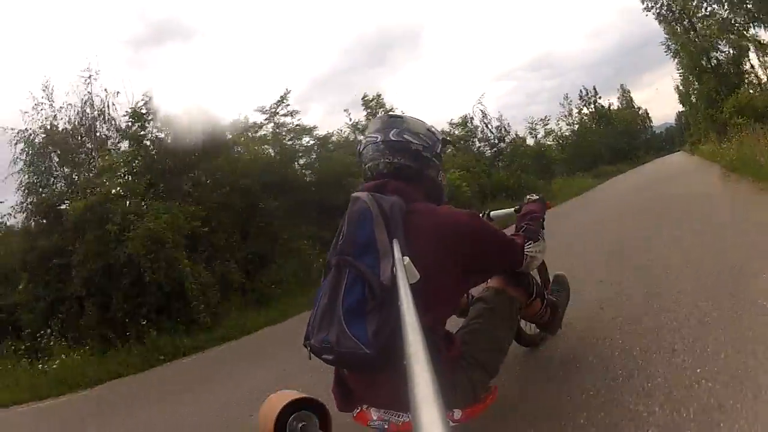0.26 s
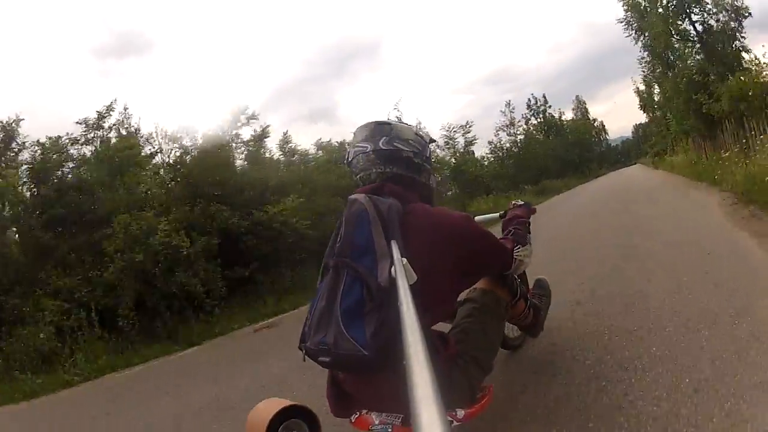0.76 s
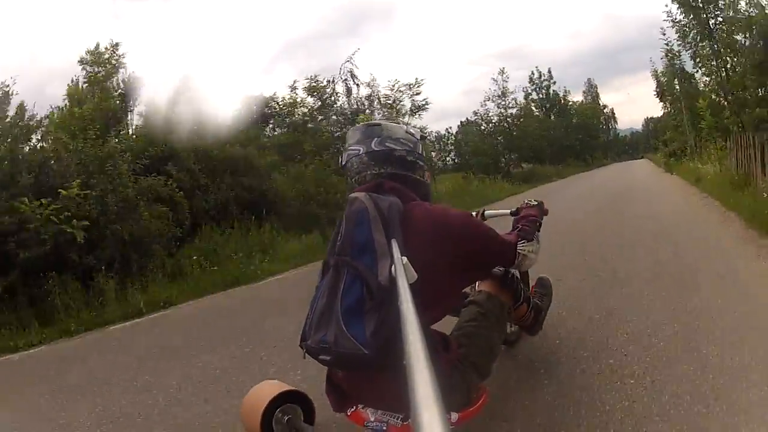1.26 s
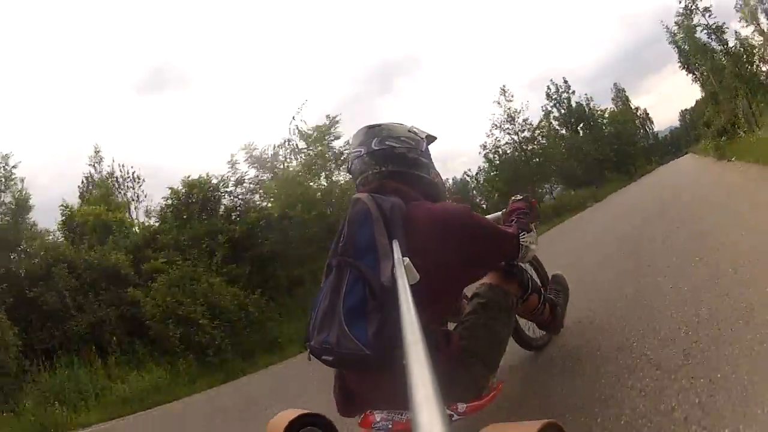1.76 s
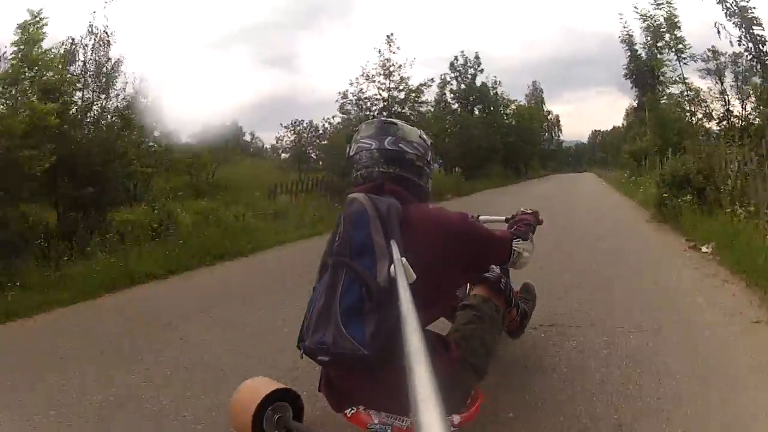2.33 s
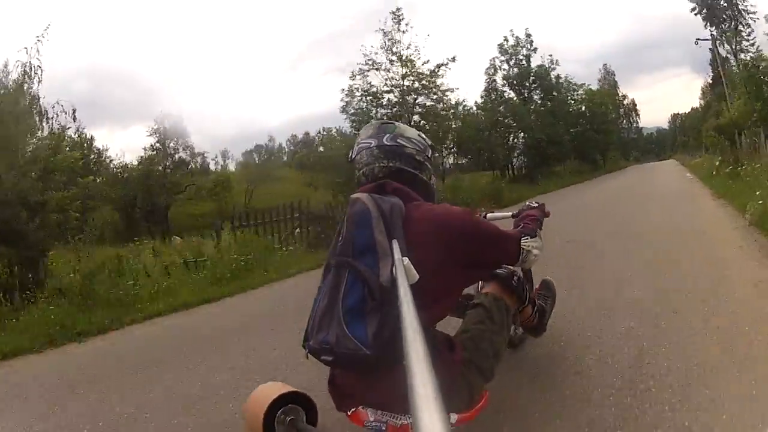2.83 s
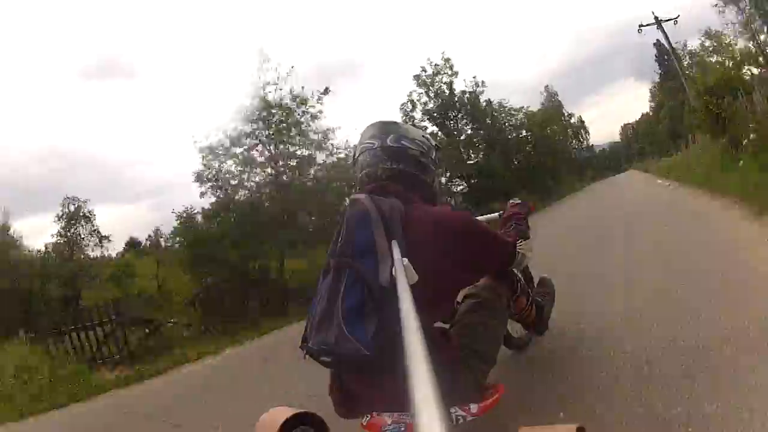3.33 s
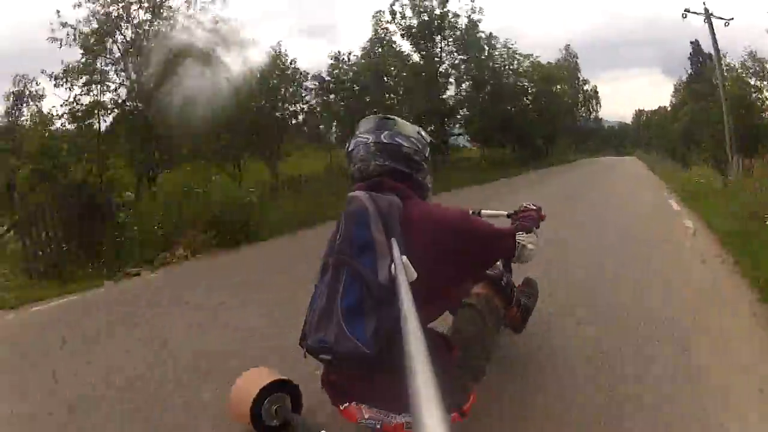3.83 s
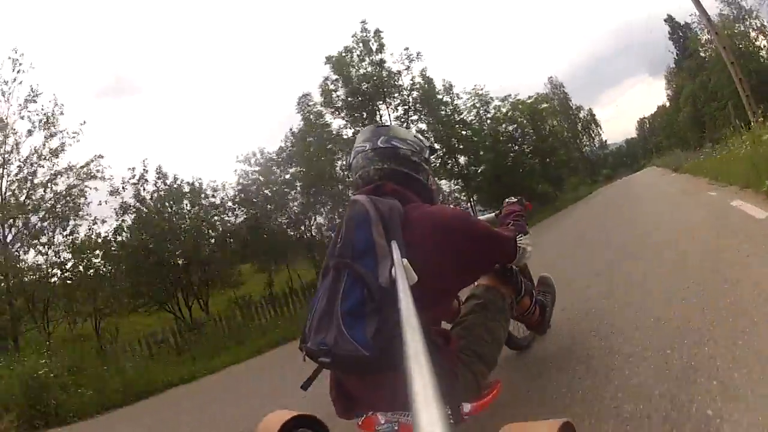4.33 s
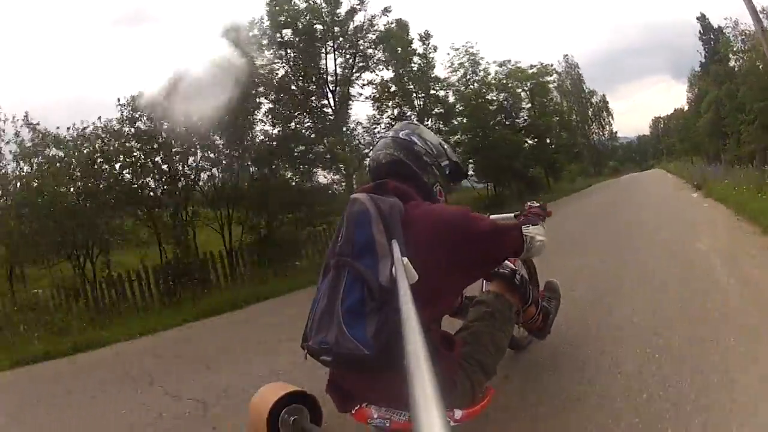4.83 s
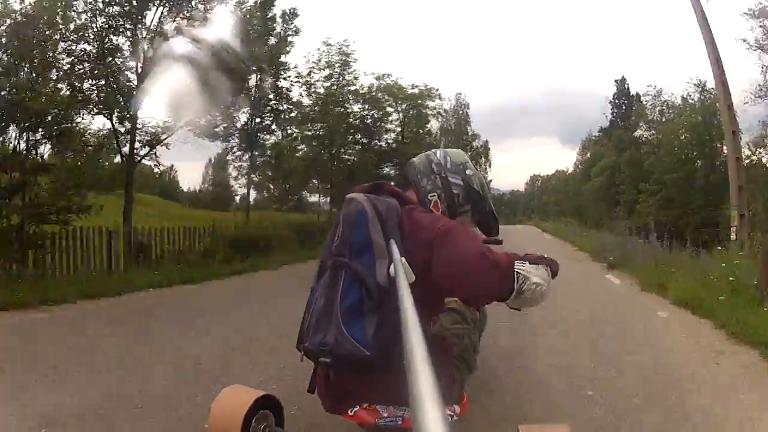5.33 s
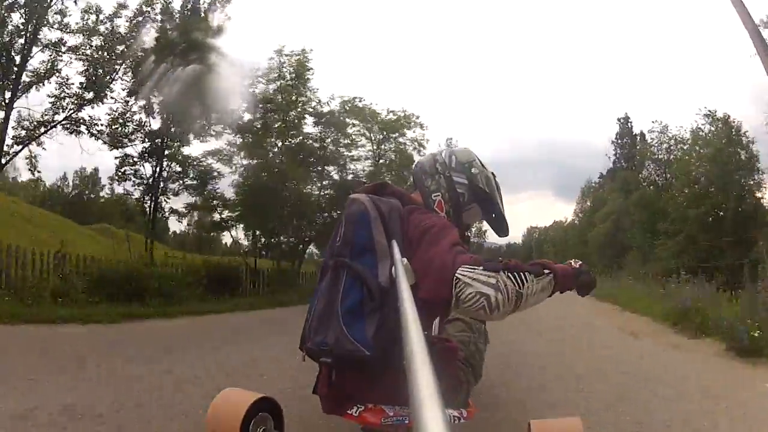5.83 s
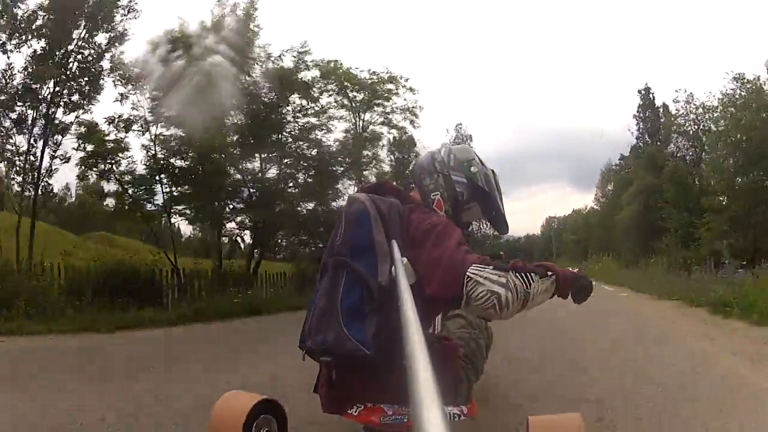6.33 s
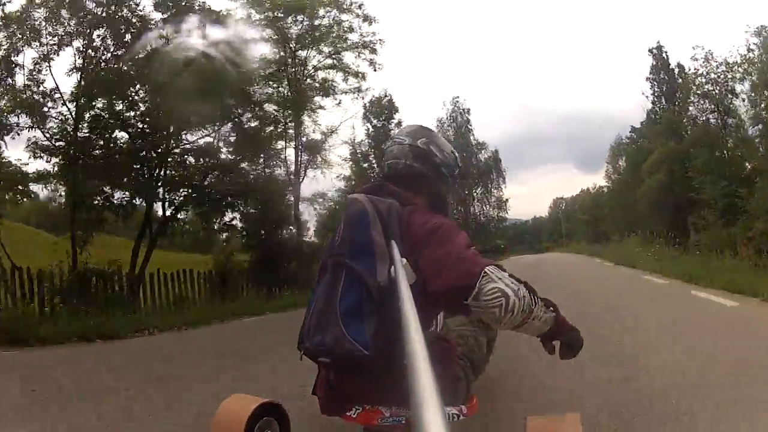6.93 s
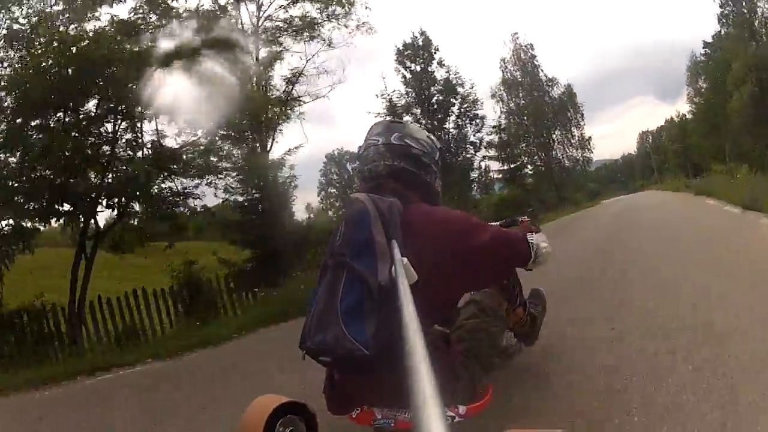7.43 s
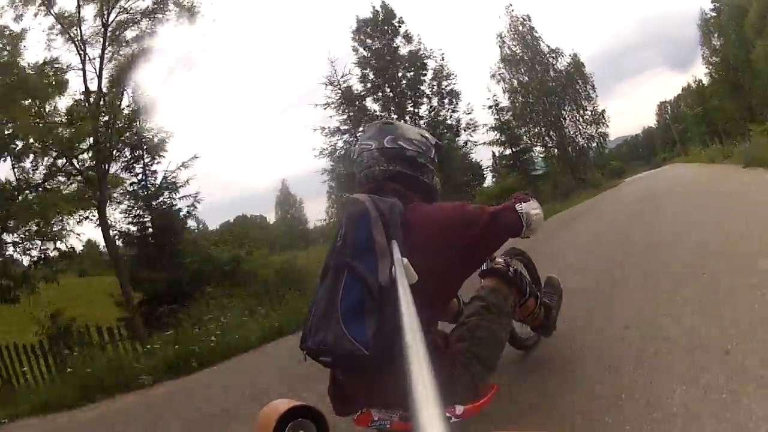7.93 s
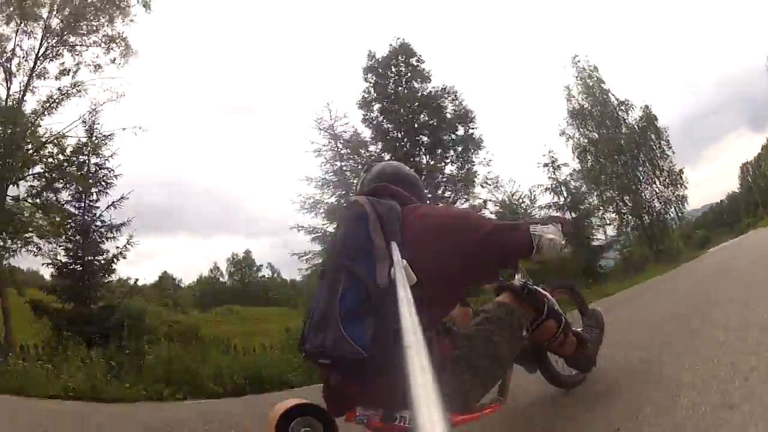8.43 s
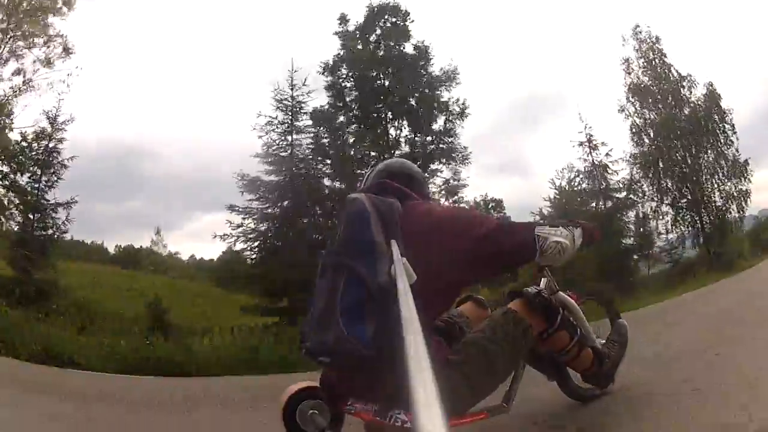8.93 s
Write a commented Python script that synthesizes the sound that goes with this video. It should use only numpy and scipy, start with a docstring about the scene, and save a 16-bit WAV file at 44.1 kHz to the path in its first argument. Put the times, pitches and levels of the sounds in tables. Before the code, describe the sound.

A fuzzy low wheel hum swells and fades over a shuddering pole and glassy hiss, broken by clacking mount knocks, small ticks and booming jolts.

```python
"""Hard wheels of a drift trike drone down an asphalt road: a fuzzy band that rises in pitch as it swells.
They shudder the pole behind the seat and rattle the mount of its cased camera; sleeves scrape in two bends.
Bumps strike the modes of mount, case, frame and a loose fitting; specks of grit hit the case.
Turbulent air hisses as fluttering noise in the case resonances.
A sample-and-hold at 12 kHz mirrors it all into a glassy treble."""
import sys
import numpy as np
from scipy import signal
from scipy.fft import rfft, irfft, next_fast_len
from scipy.io import wavfile
from scipy.ndimage import map_coordinates

SR = 44100
rng = np.random.default_rng(int(sys.argv[2]) if len(sys.argv) > 2 else 0)


def store_pcm(level_fs):
    """Save levels as 16-bit WAV."""
    pcm = np.round(np.clip(level_fs, -1, 1) * 32767).astype(np.int16)
    wavfile.write(sys.argv[1], SR, np.atleast_2d(pcm).T)


N = 404376
TIME_S = np.arange(N) / SR
GRID_HZ = np.fft.rfftfreq(16384, 1 / SR)

# wheel drone: time_s, level_db
DRONE_LEVEL = [(0, -50.5), (.27, -34.5), (.88, -34.5), (1.12, -41), (1.55, -42), (2.05, -34), (2.55, -48),
               (2.8, -34.5), (3.55, -43), (4.08, -33), (4.4, -40.5), (5.05, -44), (5.3, -34.5),
               (5.55, -50.5), (6.85, -54), (7.55, -36), (8.6, -36.5), (9.17, -40)]
# slow level of the pole shudder: time_s, level_db
SHUDDER_LEVEL = [(0, -38), (1.6, -35.5), (3, -39), (3.7, -36), (4.6, -38.5), (5.2, -33), (5.6, -26.5),
                 (6.4, -34), (7.1, -36), (8.1, -44.5), (9.17, -38.5)]
# air hiss before its common gain: time_s, level_db
AIR_LEVEL = [(0.0, -41.5), (1.86, -41.5), (2.14, -43), (3.27, -42.5), (3.42, -43.5), (4.9, -44.5),
             (6.51, -41.5), (7.66, -44.5), (8.3, -45), (9.17, -49)]
# bends, with scrape of the sleeves and rise of the drone: start_s, end_s, scrape_db, rise_hz
BENDS = [(5.554, 7.35, -57.5, 1.97), (8.601, 9.25, -54, 22)]
# mount knocks on bumps, before part gains: start_s, level_db
KNOCKS = [(0.246, -30), (0.441, -32.5), (1.129, -30.5), (1.762, -32), (1.8, -24), (2.005, -16),
          (2.147, -30), (2.755, -25.5), (2.842, -20.5), (2.901, -23), (2.99, -24.5), (3.048, -25),
          (3.206, -18), (3.892, -28.5), (3.962, -26.5), (4.0, -24.5), (4.033, -20.5), (4.12, -19),
          (4.171, -21), (4.433, -33.5), (5.009, -24.5), (5.04, -25), (5.1, -22), (5.218, -10.5),
          (5.261, -10), (5.302, -13.5), (5.33, -14.5), (5.402, -34.5), (5.697, -30), (5.81, -31.5),
          (5.886, -31), (6.912, -31), (6.978, -27.5), (7.018, -25.5), (7.051, -24.5), (7.142, -23.5),
          (7.21, -30.5), (7.249, -25), (7.316, -21), (7.371, -19.5), (7.399, -22.5), (7.458, -22),
          (8.144, -34), (8.163, -32.5)]
# jolts through the steel frame, before part gains: start_s, level_db
THUMPS = [(3.507, -25.5), (3.591, -25.5), (4.28, -37.5), (5.013, -27), (5.025, -23), (7.768, -36),
          (7.826, -37), (8.322, -22), (8.340, -25), (8.36, -24), (8.386, -13), (8.405, -13.5), (8.429, -21),
          (8.441, -11.5), (8.467, -32), (8.565, -27), (8.627, -24), (8.655, -29), (8.739, -26.5),
          (8.792, -27.5), (8.908, -26)]
# ticks of a loose fitting, before gain: start_s, level_db
TICKS = [(2.147, -32.5), (2.208, -32.5), (5.01, -30), (5.885, -34), (7.534, -33.5), (7.649, -27.5),
         (8.017, -24.5), (8.32, -29.5)]
# grit flung against the case, before gain: start_s, level_db
SPECKS = [(5.568, -36), (5.930, -32), (6.157, -33), (6.886, -31)]

# low modes of pole and mount: centre_hz, width_hz, gain_db
MOUNT_MODES = [(264, 63, -11), (259.1, 13, 1), (349.3, 28, -2.5), (373, 25, 0), (439, 20, -4.5),
               (516.8, 18, 3), (540, 32.5, -1.5), (592, 13, -6.5)]
# modes of the steel frame: centre_hz, width_hz, gain_db
FRAME_MODES = [(55, 16, -0.5), (104.6, 13, 4), (147, 23, -6.5), (246, 15, -6), (377, 27, 5.5),
               (458, 53, -10), (518, 38, -3.5), (1166, 71, -12), (1900, 150, -27), (2240, 280, -37)]
# modes of the loose fitting: centre_hz, width_hz, gain_db
FITTING_MODES = [(531.7, 670, -13.5), (1160, 120, -5), (1640, 110, -4), (1884, 100, 3.5), (3480, 400, -26)]
# air resonances in the camera case: centre_hz, width_hz, gain_db
CASE_MODES = [(608, 62, -4), (978, 95, -10), (1280, 170, -16), (2221, 246, -1.5), (2700, 300, -35),
              (3424, 157, -16), (4560, 1400, -23)]
# clack of the plastic case in its mount: centre_hz, width_hz, gain_db
CLACK_MODES = [(826, 60, -3.5), (1162, 46, 1), (1570, 180, -1), (1915, 63, 0.5), (2284, 210, 4.5),
               (3540, 280, -2.5)]
# modes of the plastic sleeves: centre_hz, width_hz, gain_db
SLEEVE_MODES = [(950, 150, 2), (1110, 120, -21), (1380, 110, 6)]

# shudder spectrum: freq_hz, gain_db (per Hz)
SHUDDER_COLOUR = [(12, -23), (26, -8.5), (42, -7), (53, 0), (61, 1), (74, -11.5), (100, -22.5), (400, -49),
                  (1000, -120)]
# force of the asphalt grit: freq_hz, gain_db
ROAD_COLOUR = [(100, 18), (250, -2), (300, -6.5), (370, -2), (520, -9), (700, 2.5), (1250, -3), (1700, -2),
               (4000, -1)]
# tint of the case hiss: freq_hz, gain_db
CASE_COLOUR = [(200, 11.5), (500, -0.5), (780, -6), (1000, -1), (1650, -4), (2200, 0.5), (3000, -2),
               (3550, 3), (4000, -7), (5500, -1)]
# tint of the mount thud: freq_hz, gain_db
MOUNT_COLOUR = [(60, 4), (200, 6), (262, 1.5), (300, -23.5), (340, 0.5), (600, -0.5), (760, -6.5),
                (1500, -4), (4000, -36)]
# tint of clacks and ticks: freq_hz, gain_db
CLACK_COLOUR = [(200, 8), (800, 10), (2550, 0), (2950, -5.5), (3500, 1), (4300, -10), (6000, -8)]
# tint of the frame jolt above its boom: freq_hz, gain_db
FRAME_COLOUR = [(230, 9), (500, -2.5), (750, 2), (1200, 3), (1500, -8), (2300, 4), (4000, -16)]
# tints of sleeve scrape and speck: freq_hz, gain_db
SLEEVE_COLOUR = [(300, -12), (900, 2), (1400, 2), (2000, 0), (4000, -30)]
SPECK_COLOUR = [(1000, -14), (2300, -9), (5000, -6)]

HOLD_HZ, HOLD_INPUT_HZ, TOP_HZ = 12000, 5750, 15400
SWAY_HZ, SWAY_PEAK_S, SWAY_DB = 2.0, .13, 2  # shudder swells once per swing of the pole
DRONE_HZ, LOUD_RISE_HZ, LOUD_DB = 98.8, 17, -34.5  # pitch when faint; its rise at drone level LOUD_DB
BEND_EASE_S = 0.14  # time to lean in or out
GRIT_DB, GRIT_DB_PER_DB = -48.5, 0.31  # rattle on smooth asphalt at LOUD_DB; growth with the drone
PATCH_DB, PATCH_S, PATCH_DB_PER_DB = -39, 0.25, 0.65  # rattle near a 0 dB bump; length; growth with bump
CLACK_DB, CLACK_PLAY_DB = -3, -30  # clack re knock; loose-case clack on any knock
CLACK_HARD_DB, CLACK_DB_PER_DB = -20.5, 0.37  # harder blows drive the case into its stop; extra clack
BOOM_DB, BOOM_DB_PER_DB = 24.5, 1.36  # tint at 150 Hz for a 0 dB jolt; its growth with the jolt


def amp(db):
    """Decibels to gain."""
    return 10 ** (np.asarray(db) / 20)


def unit(x):
    """Scale to rms 1."""
    return x / np.sqrt(np.mean(x ** 2) + 1e-20)


def colour(points, hz):
    """Gain interpolated in dB on a log frequency axis."""
    freq_hz, gain_db = np.transpose(points)
    return amp(np.interp(np.log(hz + 1), np.log(freq_hz + 1), gain_db))


def curve(rows):
    """Level per sample from time_s, level_db rows."""
    time_s, level_db = np.transpose(rows)
    return np.interp(TIME_S, time_s, level_db)


def wobble(rate_hz):
    """Smooth random curve through rate_hz knots a second."""
    knots = rng.standard_normal(int(N * rate_hz / SR) + 4)
    return map_coordinates(knots, [TIME_S * rate_hz])


def filtered(x, response):
    """Zero-phase filter by a gain function of frequency."""
    size = next_fast_len(len(x) + SR // 4)
    gain = response(np.fft.rfftfreq(size, 1 / SR))
    return irfft(rfft(x, size) * gain, size)[:len(x)]


def low_pass(x, edge_hz):
    """Very steep band limit."""
    return filtered(x, lambda hz: 1 / np.sqrt(1 + (hz / edge_hz) ** 90))


def resonances(modes, tint, vary_db):
    """Power sum of mode peaks under a broad tint; vary_db spreads the mode levels."""
    hz = GRID_HZ
    peaks = []
    for centre_hz, width_hz, gain_db in modes:
        gain = amp(gain_db + vary_db * rng.standard_normal())
        peaks.append(gain * hz * width_hz / np.hypot(centre_hz ** 2 - hz ** 2, hz * width_hz))
    return np.linalg.norm(peaks, axis=0) * colour(tint, hz)


def ringing(x, modes, tint):
    """Steady excitation x through a set of modes, rms 1."""
    gain = resonances(modes, tint, 0)
    return unit(filtered(x, lambda hz: np.interp(hz, GRID_HZ, gain)))


def blow(modes, tint, vary_db, travel_s=0):
    """Causal ring of one blow, peak 1; as a bending wave, 500 Hz takes travel_s and lower parts longer."""
    # folded cepstrum gives minimum phase
    cepstrum = irfft(np.log(resonances(modes, tint, vary_db) + 1e-5))
    half = len(cepstrum) // 2
    cepstrum[1:half] *= 2
    cepstrum[half + 1:] = 0
    lag_rad = 4 * np.pi * travel_s * np.sqrt(500 * GRID_HZ)
    ring = irfft(np.exp(rfft(cepstrum) - 1j * lag_rad))
    return ring / np.abs(ring).max()


def scuffed(ring, contact_s, rough, size=1024):
    """One main impact and a burst of tiny ones, strongest after contact_s, drive the ring; peak 1."""
    u = np.arange(size) / SR / contact_s
    burst = u * np.exp(-u) * rng.standard_normal(size)
    force = rough * burst / np.linalg.norm(burst)
    force[np.argmin(np.abs(u - 1))] += 1
    sound = signal.fftconvolve(ring, force)
    return sound / np.abs(sound).max()


def swinging(z):
    """Narrow-band vibration with its largest swings held back, rms 1."""
    power = np.abs(z) ** 2
    return unit(z.real / (power + np.mean(power)) ** .3)


def add(track, start_s, sound):
    """Mix a sound into the track at start_s."""
    part = track[max(0, round(start_s * SR)):][:len(sound)]
    part += sound[:len(part)]


def air():
    """Turbulent noise excites the case; eddies make all its resonances flutter together."""
    eddies = amp(0.74 * wobble(16) + 1.12 * wobble(60) + 0.96 * wobble(280))
    hiss = ringing(eddies * rng.standard_normal(N), CASE_MODES, CASE_COLOUR)
    return amp(curve(AIR_LEVEL) + 2.5) * hiss


def specks():
    """Flung grit strikes the case resonances with short rough contacts."""
    track = np.zeros(N)
    for start_s, level_db in SPECKS:
        ring = blow(CASE_MODES, SPECK_COLOUR, vary_db=2)
        add(track, start_s, amp(level_db + 6.5) * scuffed(ring, contact_s=.0007, rough=1.7))
    return track


def ticks():
    """Bumps flick a loose fitting, which rings in its own modes."""
    track = np.zeros(N)
    for start_s, level_db in TICKS:
        ring = blow(FITTING_MODES, CLACK_COLOUR, vary_db=1.5, travel_s=.003)
        add(track, start_s - .001, amp(level_db + 7.0) * scuffed(ring, contact_s=.001, rough=.8))
    return track


def thumps():
    """Jolts ring the steel frame, with more boom when harder, and scuff the case."""
    track = np.zeros(N)
    for start_s, level_db in THUMPS:
        boom_db = BOOM_DB + BOOM_DB_PER_DB * level_db
        jolt = blow(FRAME_MODES, [(150, boom_db), *FRAME_COLOUR], vary_db=1.2, travel_s=.0035)
        add(track, start_s - .002, amp(level_db + 2.0) * jolt)
        clack = scuffed(blow(CLACK_MODES, CLACK_COLOUR, vary_db=3), contact_s=.0016, rough=4.5)
        add(track, start_s, amp(level_db - 17.5) * clack)
    return track


def knocks():
    """Bumps knock the mount: the case clacks first, slower low bending waves thud after."""
    track = np.zeros(N)
    for start_s, level_db in KNOCKS:
        clack_db = level_db + CLACK_DB + CLACK_DB_PER_DB * max(0, level_db - CLACK_HARD_DB)
        clack_gain = np.hypot(amp(clack_db), amp(CLACK_PLAY_DB))
        clack = blow(CLACK_MODES, CLACK_COLOUR, vary_db=1.5, travel_s=.003)
        clack = scuffed(clack, contact_s=.0013, rough=.55)
        thud = blow(MOUNT_MODES, MOUNT_COLOUR, vary_db=1.4, travel_s=.0028)
        add(track, start_s - .0017, clack_gain * clack)
        add(track, start_s - .0015, amp(level_db + 3.5) * thud)
    return track


def bends():
    """Scrape gain and drone rise in Hz, eased in and out of each bend."""
    start_s, end_s, scrape_db, rise_hz = np.transpose(BENDS)
    inside_s = np.minimum(TIME_S - start_s[:, None], end_s[:, None] - TIME_S)
    lean = np.clip(inside_s / BEND_EASE_S + .5, 0, 1)
    return amp(scrape_db) @ lean, rise_hz @ lean


def scrub():
    """In a bend the plastic sleeves slip sideways and scrape as uneven noise in their modes."""
    slips = amp(2.7 * wobble(45)) * rng.standard_normal(N)
    scrape_gain, _ = bends()
    return scrape_gain * ringing(slips, SLEEVE_MODES, SLEEVE_COLOUR)


def roughness(drone_db):
    """Rattle gain: grows with the drone; every bump lies in a patch of coarser asphalt."""
    patch_power = np.zeros(N)
    for start_s, level_db in KNOCKS + THUMPS:
        shape = np.exp(-(2 * (TIME_S - start_s) / PATCH_S) ** 2)
        patch_power += amp(PATCH_DB_PER_DB * level_db) ** 2 * shape
    smooth = amp(GRIT_DB + GRIT_DB_PER_DB * (drone_db - LOUD_DB))
    return np.sqrt(smooth ** 2 + amp(PATCH_DB) ** 2 * patch_power)


def grit_rattle(drone_db):
    """Random grit impacts, about 600 a second, ring the mount."""
    hits = rng.random(N) < 600 / SR
    stones = hits * rng.standard_normal(N) * amp(2.5 * wobble(25))
    return roughness(drone_db) * ringing(stones, MOUNT_MODES, ROAD_COLOUR)


def pole_shudder():
    """Low noise of the shaken pole, swelling once per sway."""
    swell_db = SWAY_DB * np.cos(2 * np.pi * SWAY_HZ * (TIME_S - SWAY_PEAK_S))
    level_db = curve(SHUDDER_LEVEL) + swell_db + 1.34 * wobble(9)
    noise = filtered(rng.standard_normal(N), lambda hz: colour(SHUDDER_COLOUR, hz))
    return amp(level_db) * swinging(signal.hilbert(noise))


def sleeve_drone(drone_db):
    """The road shakes the sleeves at random: a fuzzy band whose pitch rises with level and in bends."""
    _, bend_rise_hz = bends()
    pitch_hz = DRONE_HZ + LOUD_RISE_HZ * amp(drone_db - LOUD_DB) + bend_rise_hz
    phase = 2 * np.pi * np.cumsum(pitch_hz) / SR
    texture = wobble(30) + 1j * wobble(30) + .27 * (wobble(80) + 1j * wobble(80))
    return amp(drone_db + 2.0 * wobble(9)) * swinging(texture * np.exp(1j * phase))


def wheels():
    """Hard wheels on coarse asphalt drive the pole, the sleeves and the mount."""
    drone_db = curve(DRONE_LEVEL)
    return pole_shudder() + grit_rattle(drone_db) + sleeve_drone(drone_db)


def scene():
    """Sum of all sources at the one microphone inside the case."""
    bumps = specks() + ticks() + thumps() + knocks()
    return (air() + bumps + scrub() + wheels())[None]


def record(dry):
    """Coarse sampling with each value held, which mirrors the sound into a glassy treble."""
    coarse = signal.resample_poly(low_pass(dry[0], HOLD_INPUT_HZ), HOLD_HZ, SR, window=("kaiser", 2))
    held = signal.resample_poly(np.repeat(coarse, 4), SR, 4 * HOLD_HZ)[:N]
    return low_pass(held, TOP_HZ)[None]


dry = scene()
out = record(dry)
store_pcm(out)
```